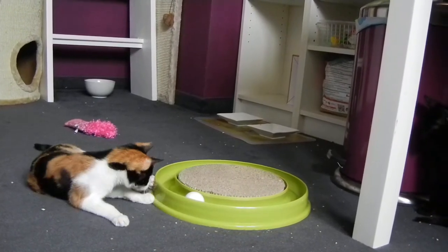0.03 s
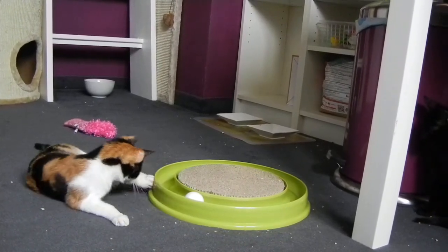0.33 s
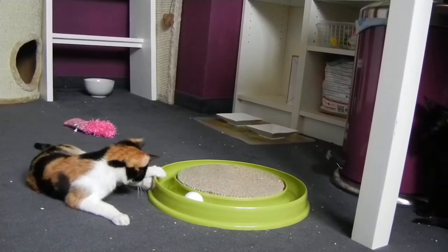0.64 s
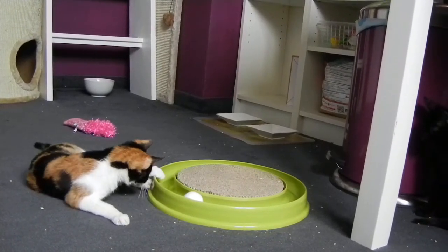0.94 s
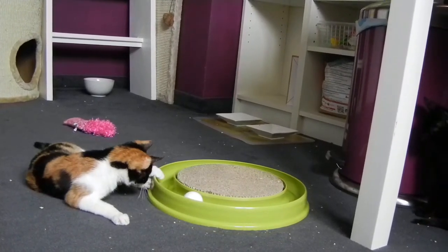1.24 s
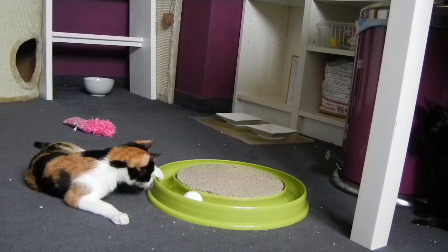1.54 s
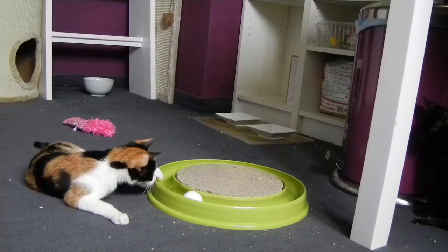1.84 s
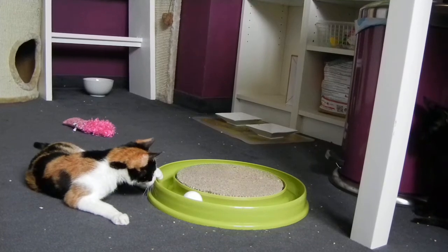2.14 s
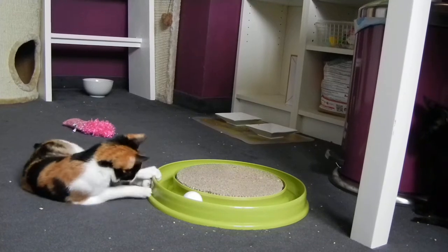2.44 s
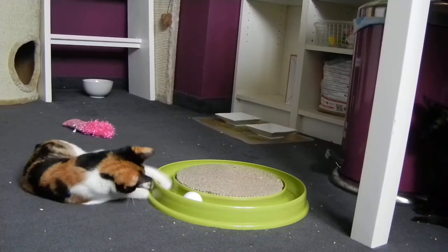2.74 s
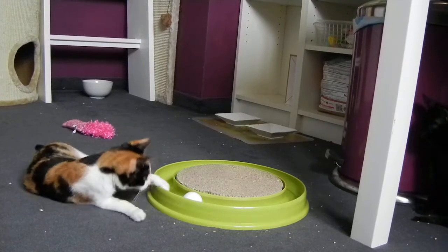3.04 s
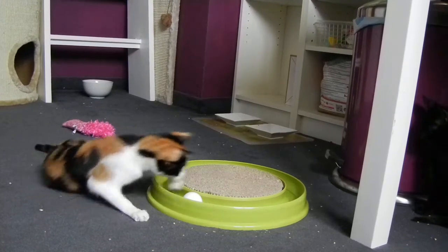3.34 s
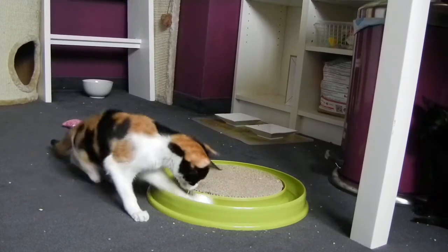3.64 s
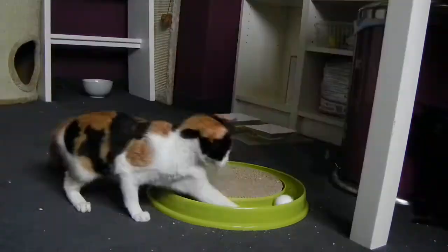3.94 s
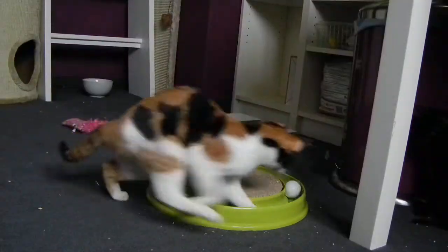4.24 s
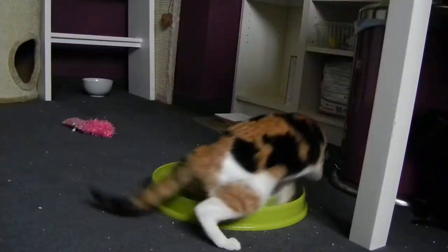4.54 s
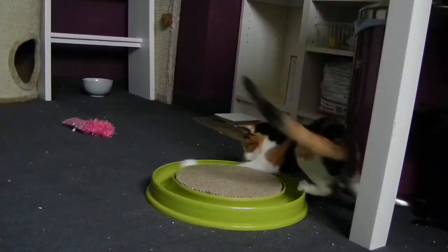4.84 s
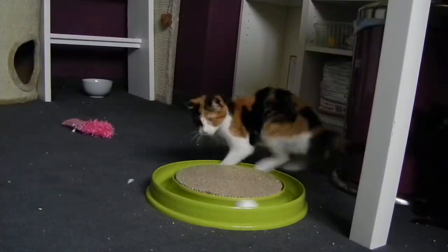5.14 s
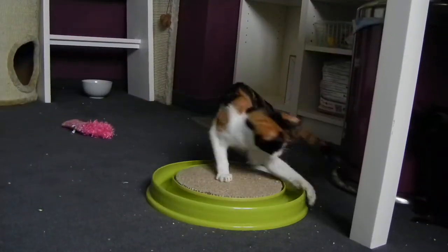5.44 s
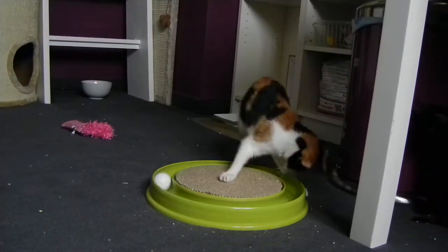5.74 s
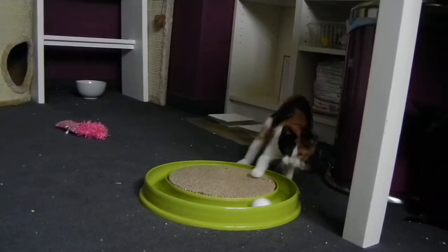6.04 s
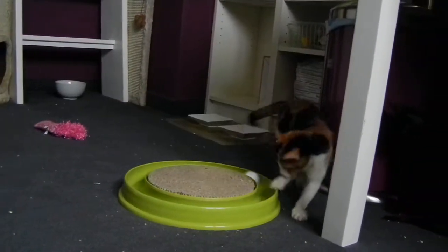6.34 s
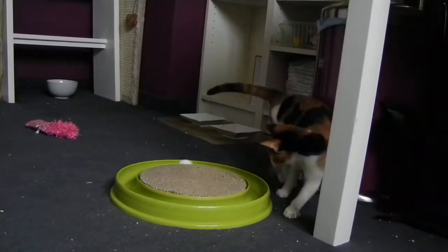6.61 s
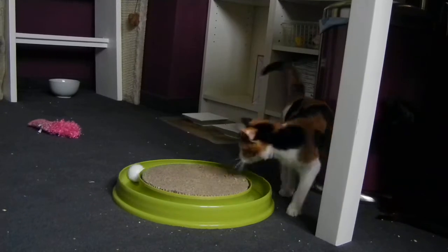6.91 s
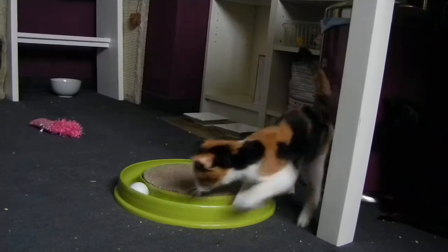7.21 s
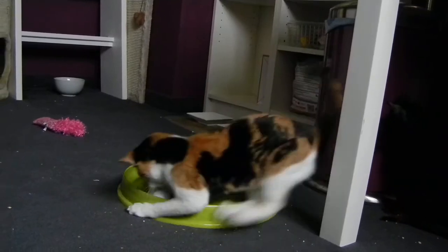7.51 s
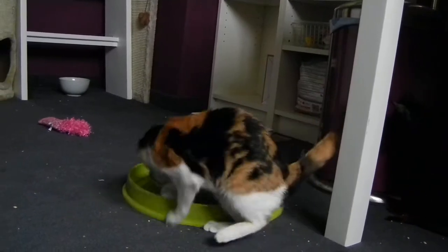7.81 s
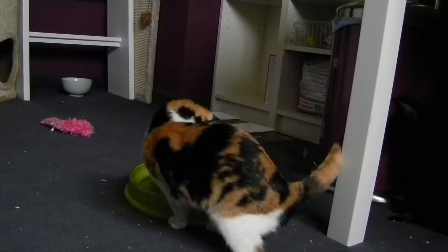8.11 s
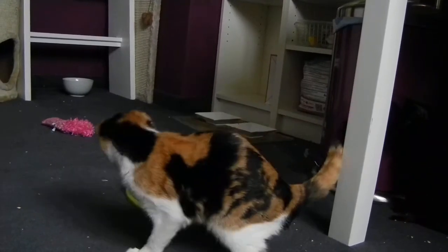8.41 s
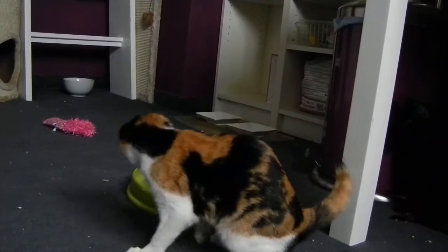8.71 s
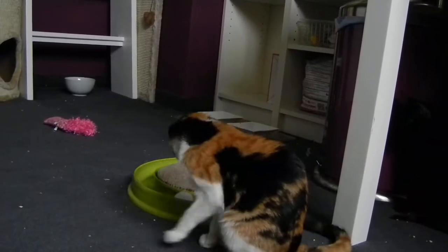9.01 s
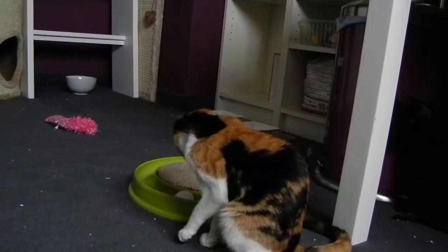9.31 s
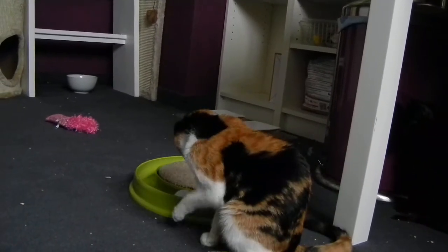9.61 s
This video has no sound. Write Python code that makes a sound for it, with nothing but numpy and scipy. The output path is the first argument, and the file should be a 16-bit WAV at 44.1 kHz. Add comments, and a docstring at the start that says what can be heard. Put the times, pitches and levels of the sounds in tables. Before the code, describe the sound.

A cat pats softly at the floor and ticks its claws against a plastic track toy. Then it bats a hard ball, which rumbles around the hollow circular groove, speeding up, clacking against the walls and hopping. Paws bump the toy and thud on the carpet before the ball stops abruptly, leaving a few dull knocks. The toy is close to the microphone in a small room with faint hiss and a distant ticking clock.

```python
"""A small carpeted room: a cat bats a hard ball round the groove of a circular plastic track toy.
The ball rumbles over the hollow shell, clacks against the walls and hops at speed.
Claws tick and scratch; padded paws bump the toy and thud on the floor.
Behind it the room hisses faintly, a clock ticks and a picture tube whines."""
import sys
import numpy as np
from scipy import signal
from scipy.fft import rfft, irfft
from scipy.io import wavfile

SR = 44100
rng = np.random.default_rng(int(sys.argv[2]) if len(sys.argv) > 2 else 0)


def log_audio(samples):
    """Write samples as a 16-bit WAV file to the path given in sys.argv[1]."""
    # one column per channel
    frames = np.atleast_2d(samples).T
    # limit to full scale, then quantise
    limited = np.clip(frames, -1, 1)
    pcm = np.round(limited * 32767).astype(np.int16)
    wavfile.write(sys.argv[1], SR, pcm)


N = 434826
TIME = np.arange(N) / SR
CUTOFF_HZ = 15950

# hiss spectrum: freq_hz, relative_db
HISS_SPECTRUM = [(25, -28), (55, -14), (85, -3.5), (130, -2), (200, -6), (270, -10), (400, -3), (750, -6.5),
                 (1500, -7), (2800, -8), (4400, -17), (5800, -16.5), (9000, -20), (15800, -19.5)]
# left-right likeness of hiss and of echoes: freq_hz, correlation
HISS_LIKENESS = [(60, 0.81), (150, 0.078), (380, 0.18), (950, 0.13), (2380, 0.29), (5980, 0.019),
                 (15000, 0.022)]
ROOM_LIKENESS = [(300, 0.93), (1500, 0.92), (3500, 0.71), (8000, 0.34)]
# echo decay: freq_hz, t60_s
ROOM_DECAY = [(200, 0.28), (1400, 0.25), (3700, 0.25), (10000, 0.12)]
# echo colour: freq_hz, relative_db
ROOM_SPECTRUM = [(400, -4), (1500, -3), (6000, 1)]

# paws on the floor, soft steps to landings: start_s, level_db
STEPS = [(0.361, -42), (0.489, -44), (0.596, -45), (1.13, -43), (2.799, -45), (2.941, -42), (3.16, -43),
         (6.436, -23.5), (6.478, -28.5), (7.119, -41), (7.467, -29.5), (7.686, -41)]
# floor modes: pitch_hz, t60_s, growth_db_per_db
FLOOR_MODES = [(96, 0.16, 0.5), (125, 0.17, 0.6), (171, 0.17, 0.9), (218, 0.069, .7)]
# claws on the cardboard pad and rim: start_s, length_s, level_db
SCRATCHES = [(3.717, 0.13, -48), (4.89, 0.071, -41.5), (5.10, 0.047, -50), (5.277, 0.076, -49.5),
             (6.058, 0.048, -47)]

# plastic shell modes: pitch_hz, width_hz, lift_db
SHELL_MODES = [(117, 69, 5.5), (172, 30, -7.5), (312.5, 53, 7), (365.4, 6.7, 4), (401, 62, 3.5),
               (444.7, 21, 14.5), (561.4, 10.5, 12.5), (586, 9.5, 6), (700.4, 19, 11.5), (774, 68, 10.5),
               (885, 22, 4), (936, 13, 4.5), (938, 12, 5), (1216, 23, 8), (1420, 53, 3.5), (1460, 41, 6.5),
               (1936, 105, 3), (2460, 83, 3.5)]
# broad colour of the toy: freq_hz, relative_db
TOY_SPECTRUM = [(55, -17.5), (92, -7.5), (240, 2.5), (272, -11.5), (305, 1.5), (520, 3.5), (820, -3.5),
                (1080, -5.5), (1400, -2), (2000, -5.5), (3100, -9.5), (4300, -25.5), (8000, -34.5),
                (15000, -43)]
# bounds of thump, hollow, clack and crack: edge_hz
REGISTER_EDGES = [60, 290, 1000, 4000, 16000]
# a paw starts, speeds up and stops the ball: start_s, speed_turns_per_s
PUSHES = [(3.709, 0.26), (3.79, 0.34), (4.39, 0.64), (4.661, .64), (4.89, 1.5), (7.5, 0.0098)]

# blows on the toy, pitched by the struck spot: start_s, level_db, pitch_hz
CLAW_TAPS = [(0.645, -38.5, 1530), (2.512, -35.5, 2980), (2.52, -34, 1700), (2.771, -32.5, 2070),
             (3.746, -35, 1650), (4.262, -42, 2070), (4.55, -31.5, 3200), (4.777, -33, 3030),
             (6.378, -39.5, 3200)]
PAW_BUMPS = [(3.948, -32.5, 560), (4.19, -36, 557), (4.71, -32, 750), (5.961, -29.5, 594),
             (6.067, -26, 523.5), (6.173, -22, 840), (6.428, -19, 654), (6.705, -27, 800),
             (7.118, -34.5, 810), (7.619, -32, 857), (7.929, -39.5, 700), (7.949, -29, 636),
             (8.104, -28, 680), (8.276, -49, 450), (9.27, -52.5, 440)]
WALL_CLACKS = [(3.713, -37.5, 1230), (3.789, -24, 1390), (3.797, -17.5, 890), (3.847, -25.5, 1600),
               (3.875, -35, 1900), (4.5399, -22, 2320), (4.542, -28, 1460), (4.889, -30, 880),
               (4.922, -22, 1894), (4.99, -26.5, 1430), (5.034, -26.5, 1380), (5.1887, -21, 1430),
               (5.227, -29.5, 955), (5.253, -28, 1574), (5.341, -26.5, 1380), (7.452, -19.5, 1560),
               (7.465, -25.5, 1717)]
BALL_HOPS = [(5.477, -24.5, 1800), (5.571, -22.5, 1410), (5.688, -24, 1400), (5.786, -24.5, 1294),
             (5.888, -30, 1106), (6.101, -27.5, 1110), (6.28, -24, 960), (6.339, -27.5, 1303),
             (6.535, -37.5, 1200), (6.641, -34.5, 908), (6.913, -36.5, 914), (7.479, -24.5, 1200)]
# colour per kind of blow: thump_db, hollow_db, clack_db, crack_db
TAP_DB, BUMP_DB = (-24, -10.5, -0.5, -13.5), (-13.5, -7, -10, -21)
CLACK_DB, HOP_DB = (-17, -2, -1, -20), (-13.5, 1, -4.5, -14)

# rolling: gain at 1 turn/s, exponent of speed
RUMBLE_DB, RUMBLE_POWER = -29, 0.86
RATTLE_DB, RATTLE_POWER = -34.5, 1.5


def from_db(db):
    """Decibels to gain."""
    return 10 ** (np.asarray(db) / 20)


def unit_rms(x):
    """Scale to rms 1."""
    return x / np.sqrt(np.mean(x ** 2) + 1e-20)


def at_hz(table, hz):
    """Table lookup on a log-frequency axis."""
    freq_hz, value = np.transpose(table)
    return np.interp(np.log(np.maximum(hz, 1)), np.log(freq_hz), value)


def decay(t, t60_s):
    """Exponential fall, 60 dB in t60_s."""
    return np.exp(-np.log(1000) * t / t60_s)


def band(x, low_hz, high_hz, order=3):
    """Causal band-pass."""
    sos = signal.butter(order, [low_hz, high_hz], "band", fs=SR, output="sos")
    return signal.sosfilt(sos, x + 1e-18)


def resonance(x, hz, width_hz):
    """Two-pole resonator, peak gain 1."""
    r = np.exp(-np.pi * width_hz / SR)
    feedback = [1, -2 * r * np.cos(2 * np.pi * hz / SR), r * r]
    return signal.lfilter(np.array([1, 0, -1]) * (1 - r * r) / 2, feedback, x + 1e-18)


def coloured(x, spectrum, size=4096):
    """Minimum-phase filter with the given spectrum."""
    gain = from_db(at_hz(spectrum, np.fft.rfftfreq(size, 1 / SR)))
    cepstrum = irfft(np.log(gain))
    cepstrum[1:size // 2] *= 2
    cepstrum[size // 2 + 1:] = 0
    response = irfft(np.exp(rfft(cepstrum)))
    filtered = signal.fftconvolve(np.atleast_2d(x), response[None], axes=1)
    return filtered[:, :x.shape[-1]].reshape(x.shape)


def drift(rate_hz):
    """Ramps between unit-normal random values."""
    knots = rng.standard_normal(N // 50)
    return np.interp(TIME * rate_hz, np.arange(len(knots)), knots)


def stereo_noise(likeness, size):
    """White noise, left-right correlation set per frequency."""
    mid, side = rfft(rng.standard_normal((2, size)))
    alike = np.clip(at_hz(likeness, np.fft.rfftfreq(size, 1 / SR)), 0, 1)
    return irfft(np.sqrt((1 + alike) / 2) * mid + np.sqrt((1 - alike) / 2) * side * [[1], [-1]], size)


def placed(starts_s, sounds):
    """Sum sounds at their start times."""
    track = np.zeros(N + SR)
    for start_s, sound in zip(starts_s, sounds):
        start = max(round(start_s * SR), 0)
        track[start:start + len(sound)] += sound
    return track[:N]


def registers(x):
    """Split into thump, hollow, clack and crack."""
    return [band(x, low, high) for low, high in zip(REGISTER_EDGES, REGISTER_EDGES[1:])]


def room_hiss(level_db=-49.77):
    """Steady, wide noise, strongest in the bass."""
    return from_db(level_db) * unit_rms(coloured(stereo_noise(HISS_LIKENESS, N), HISS_SPECTRUM))


def tube_whine(line_hz=15734, level_db=-76):
    """Thin line tone of a picture tube."""
    return from_db(level_db) * unit_rms(np.sin(2 * np.pi * line_hz * TIME))


def clock(first_s=0.398, case_hz=1530, width_hz=200, swell_s=0.019, level_db=-49, click_db=-23):
    """One far tick a second, smeared by the room into a soft ring of the case."""
    age = (TIME - first_s) % 1 / swell_s
    noise = rng.standard_normal(N)
    case = unit_rms(resonance(noise, case_hz, width_hz))
    click = from_db(click_db) * unit_rms(band(noise, 990, 4800))
    return from_db(level_db) * (case + click) * age * np.exp(1 - age)


def echoes(x, build_s=0.0086):
    """Diffuse room tail: builds fast, dies sooner in the treble."""
    t = np.arange(SR // 2) / SR
    noise = stereo_noise(ROOM_LIKENESS, len(t))
    edges_hz = np.geomspace(50, 17000, 9)
    tail = 0
    for low, high in zip(edges_hz, edges_hz[1:]):
        hz = np.sqrt(low * high)
        envelope = decay(t, at_hz(ROOM_DECAY, hz)) * from_db(at_hz(ROOM_SPECTRUM, hz))
        tail += band(noise, low, high) * envelope
    tail *= 1 - np.exp(-(t / build_s) ** 2)
    tail /= np.sqrt(np.sum(tail ** 2) / 2)
    return signal.oaconvolve(x[None], tail, axes=1)[:, :N]


def circling_echoes(x, turns):
    """Two echo patterns crossfade as the ball circles."""
    angle = np.pi * turns
    return echoes(x * np.cos(angle)) + echoes(x * np.sin(angle))


def floor_mode(level_db, pitch_hz, t60_s, rise_s=0.00095):
    """One damped floor mode, pushed softly."""
    t = np.arange(SR // 3) / SR
    envelope = decay(t, t60_s) * (1 - np.exp(-t / rise_s))
    return from_db(level_db) * np.sin(2 * np.pi * pitch_hz * t) * envelope


def paw_steps(gain_db=1, full_weight_db=-28, thud_s=7.81):
    """Paws drive the floor modes, equally at full weight; one dead thud on the carpet."""
    starts_s, level_db = np.transpose(STEPS)
    level_db = level_db[:, None]
    steps = sum((-1) ** k * floor_mode(level_db + growth * (level_db - full_weight_db), hz, t60_s)
                for k, (hz, t60_s, growth) in enumerate(FLOOR_MODES))
    thud = floor_mode(level_db=-10.5, pitch_hz=118, t60_s=0.012)
    return from_db(gain_db) * band(placed([*starts_s, thud_s], [*steps, thud]), 80, 900, order=2)


def scratches(low_hz=5500, catch_db=4, catch_hz=400):
    """Claw tips catch and slip: a brief, bright rasp."""
    strokes = sum(from_db(db) * np.interp(TIME - start_s, [0, length_s / 2, length_s], [0, 1, 0])
                  for start_s, length_s, db in SCRATCHES)
    rasp = rng.standard_normal(N) * from_db(catch_db * drift(catch_hz))
    return strokes * unit_rms(band(rasp, low_hz, CUTOFF_HZ, order=1))


def shell_ring(force):
    """Modes of the hollow shell, to add to the direct force."""
    return sum((from_db(lift_db) - 1) * resonance(force, hz, width_hz)
               for hz, width_hz, lift_db in SHELL_MODES)


def ball_motion(push_s=0.032, coast_s=2.3):
    """Speed (turns/s) and distance (turns): each push sets a speed, friction bleeds it off."""
    target = np.zeros(N)
    for start_s, new_speed in PUSHES:
        target = np.where(TIME >= start_s, new_speed * np.exp((start_s - TIME) / coast_s), target)
    lag = np.exp(-1 / (push_s * SR))
    speed = signal.lfilter([1 - lag], [1, -lag], target + 1e-18)
    return speed, np.cumsum(speed) / SR


def groove_ring(force, speed, turns, rest_hz=525, hz_per_speed=35, swing_hz=38, high_turns=0.086):
    """Groove resonance: rises with speed, swings twice a lap; blended from fixed resonators."""
    pitch_hz = rest_hz + hz_per_speed * speed + swing_hz * np.cos(4 * np.pi * (turns - high_turns))
    centres_hz = np.linspace(pitch_hz.min(), pitch_hz.max(), 7)
    return sum(np.interp(pitch_hz, centres_hz, share) * resonance(force, hz, width_hz=190)
               for hz, share in zip(centres_hz, np.eye(len(centres_hz))))


def rolling(speed, turns, bumps_per_s=500, spread_db=1.5, flutter_db=4.5, smooth_db=-11, groove_db=1,
            thump_db=-13, hollow_db=-0.5, clack_db=-3, crack_db=-19, near_db=1, near_turns=0.85):
    """Tiny bumps click into the shell; the fast ball rattles the walls. Louder on the near side."""
    sizes = from_db(spread_db * np.minimum(rng.exponential(1, N), 3)) * rng.choice([-1, 1], N)
    bumps = unit_rms(sizes * (rng.random(N) < bumps_per_s / SR))
    force = bumps + from_db(smooth_db) * rng.standard_normal(N)
    force *= from_db(flutter_db * drift(rate_hz=70))
    body = force + shell_ring(force) + from_db(groove_db) * groove_ring(force, speed, turns)
    thump, hollow, clack, crack = map(unit_rms, registers(coloured(body, TOY_SPECTRUM)))
    low = from_db(thump_db) * thump + from_db(hollow_db) * hollow
    high = from_db(clack_db) * clack + from_db(crack_db) * crack
    rumble = from_db(RUMBLE_DB) * speed ** RUMBLE_POWER * low
    rattle = from_db(RATTLE_DB) * speed ** RATTLE_POWER * high
    nearness = from_db(near_db * np.cos(2 * np.pi * (turns - near_turns)))
    return nearness * (rumble + rattle)


def jostles(speed, turns, count=30, offset_db=-3.5, spread_db=2.5, lowest_hz=1020):
    """Chance knocks along the track, louder at speed: start_s, level_db, pitch_hz."""
    place, size, octaves = rng.random((count, 3)).T
    starts_s = np.interp(place * turns[-1], turns, TIME)
    rattle_db = RATTLE_DB + RATTLE_POWER * 20 * np.log10(np.interp(starts_s, TIME, speed))
    level_db = rattle_db + offset_db + spread_db * (2 * size - 1)
    return zip(starts_s, level_db, lowest_hz * 2 ** octaves)


def contacts(speed, turns, hard_rise_s=0.00091, padded_rise_s=0.0046, pivot_hz=1200):
    """All blows: start_s, pitch_hz, rise_s, four register levels_db."""
    kinds = [(CLAW_TAPS, TAP_DB, hard_rise_s),
             (WALL_CLACKS, CLACK_DB, hard_rise_s),
             (BALL_HOPS, HOP_DB, hard_rise_s),
             (PAW_BUMPS, BUMP_DB, padded_rise_s),
             (jostles(speed, turns), CLACK_DB, hard_rise_s)]
    tilt_db_per_octave = np.array([0, -7.5, 0, 4.5])  # stiffer spot: less hollow, more crack
    blows = []
    for rows, colour_db, rise_s in kinds:
        for start_s, level_db, pitch_hz in rows:
            tilt_db = tilt_db_per_octave * np.log2(pitch_hz / pivot_hz)
            blows.append((start_s, pitch_hz, rise_s, *(level_db + tilt_db + colour_db)))
    return blows


def knocks(blows, snap_t60_s=0.0069, ring_t60_s=0.075, ring_db=-14, spot_db=3, spot_q=1.9, modes_db=-1):
    """The plastic snaps and shudders, the struck spot rings; hard blows bright, padded ones hollow."""
    starts_s, spots_hz, rise_s, *levels_db = np.transpose(blows)
    t = np.arange(SR // 5) / SR
    attack = 1 - np.exp(-t / rise_s[:, None])
    envelope = attack * (decay(t, snap_t60_s) + from_db(ring_db) * decay(t, ring_t60_s))
    envelope /= np.linalg.norm(envelope, axis=1, keepdims=True)
    shudders = rng.standard_normal(envelope.shape) * envelope
    spots = np.array([resonance(shudder, hz, hz / spot_q) for shudder, hz in zip(shudders, spots_hz)])
    body = shudders + from_db(spot_db) * spots + from_db(modes_db) * shell_ring(t == 0)
    sounds = 0
    for register, level_db in zip(registers(coloured(body, TOY_SPECTRUM)), levels_db):
        onset_rms = np.sqrt(np.mean(register[:, :SR // 40] ** 2, axis=1))
        sounds += register * (from_db(level_db) / onset_rms)[:, None]
    return placed(starts_s, sounds)


def scene(near_pan_db=0.74, far_pan_db=-0.38, toy_wet_db=-3, paw_wet_db=-11):
    """Toy close and slightly left; clock heard only through the room."""
    speed, turns = ball_motion()
    toy = knocks(contacts(speed, turns)) + rolling(speed, turns) + scratches()
    steps = paw_steps()
    near = toy + from_db(toy_wet_db) * circling_echoes(toy, turns) + steps
    far = echoes(clock() + from_db(paw_wet_db) * steps) + room_hiss() + tube_whine()
    leftward = np.array([[1], [-1]])
    return near * from_db(near_pan_db * leftward) + far * from_db(far_pan_db * leftward)


def record(dry, ceiling_db=-1):
    """Soft clip, then steep low-pass."""
    rounded = from_db(ceiling_db) * np.tanh(dry / from_db(ceiling_db))
    return signal.sosfilt(signal.ellip(12, .1, 80, CUTOFF_HZ, fs=SR, output="sos"), rounded)


dry = scene()
out = record(dry)
log_audio(out)
```